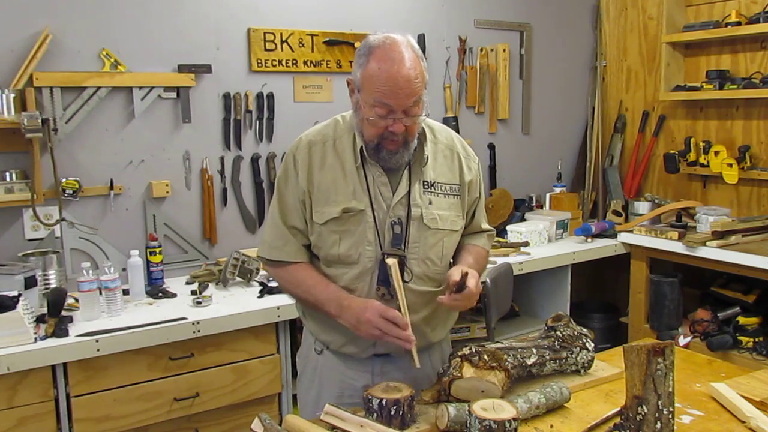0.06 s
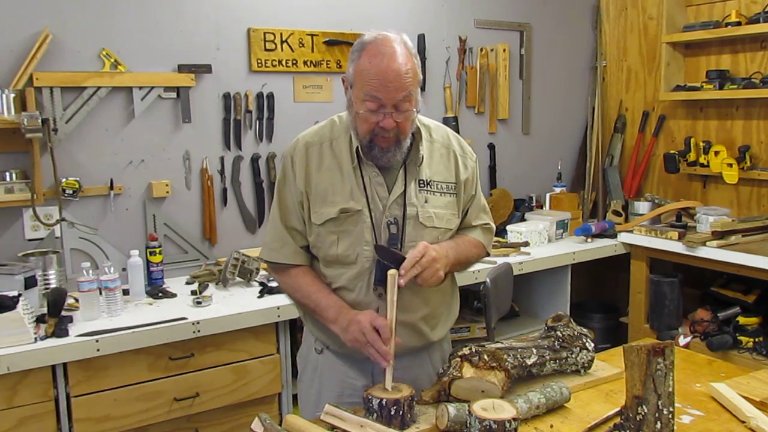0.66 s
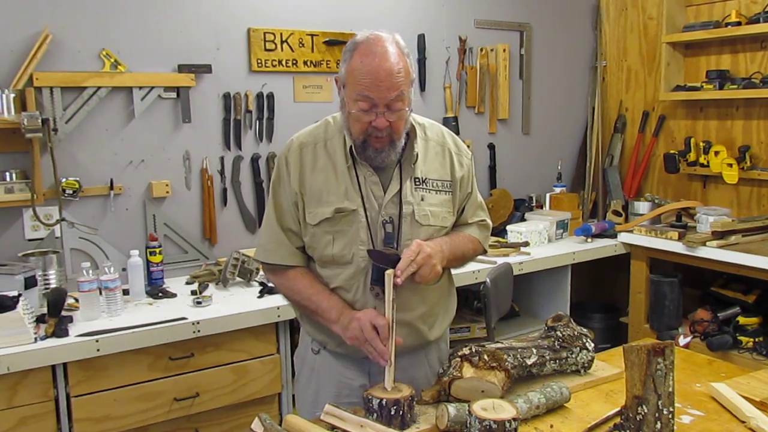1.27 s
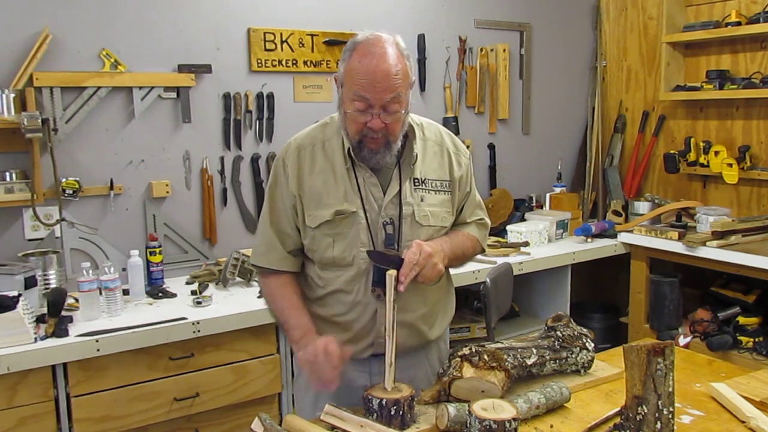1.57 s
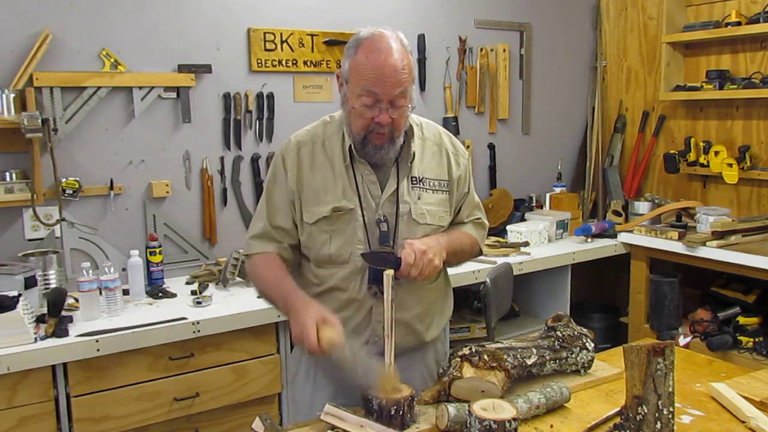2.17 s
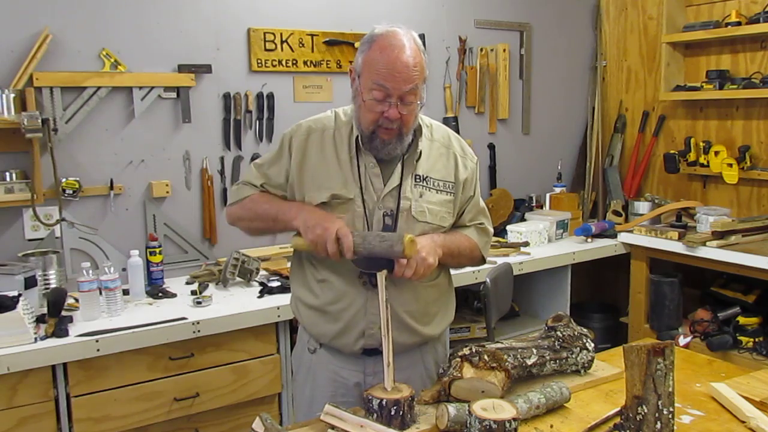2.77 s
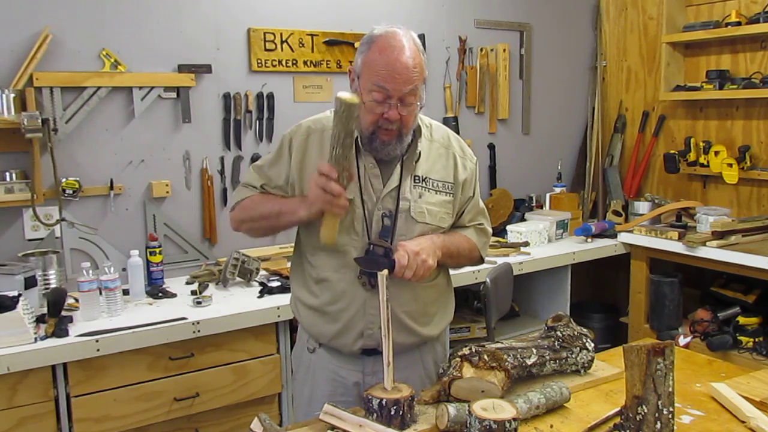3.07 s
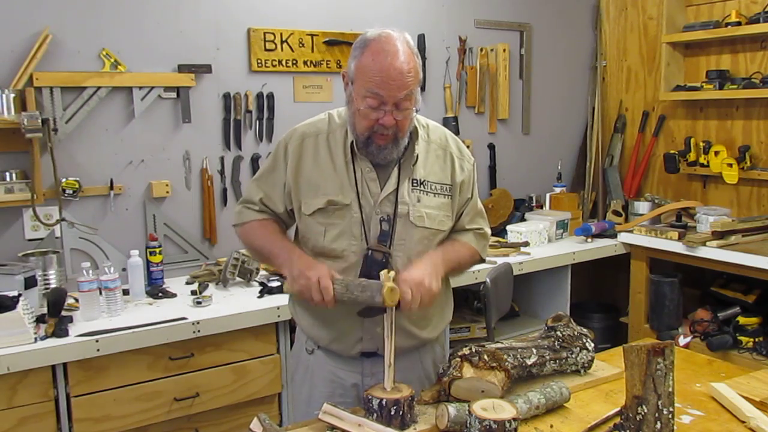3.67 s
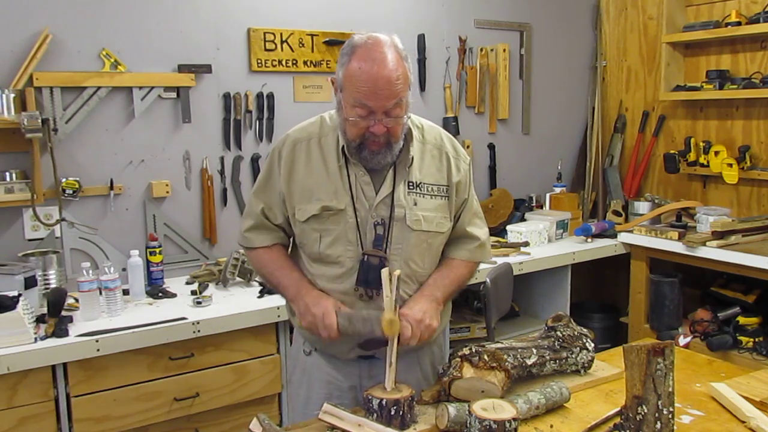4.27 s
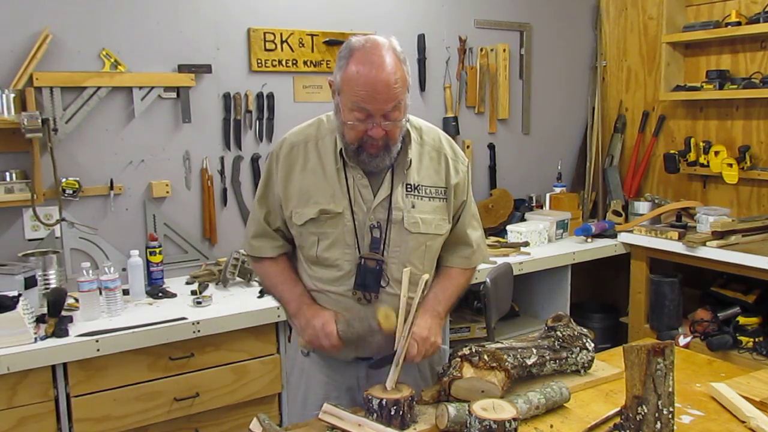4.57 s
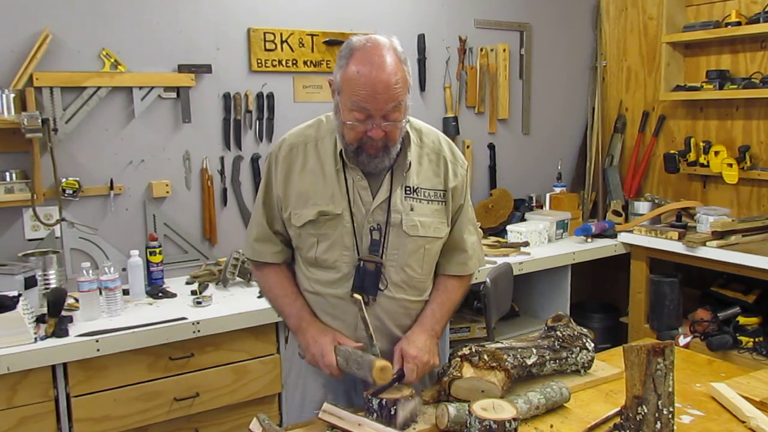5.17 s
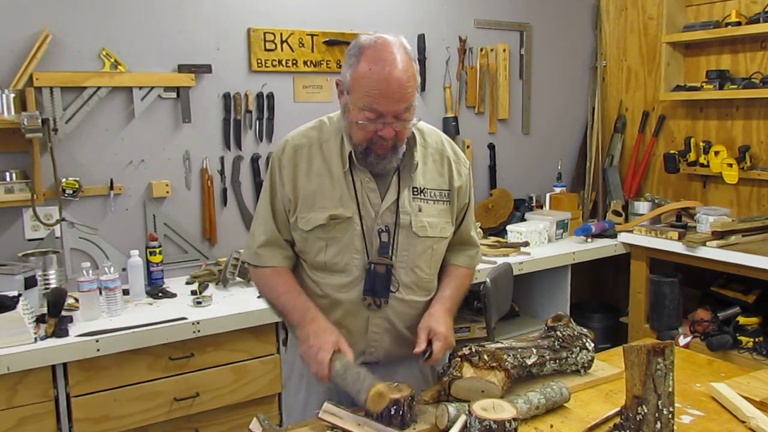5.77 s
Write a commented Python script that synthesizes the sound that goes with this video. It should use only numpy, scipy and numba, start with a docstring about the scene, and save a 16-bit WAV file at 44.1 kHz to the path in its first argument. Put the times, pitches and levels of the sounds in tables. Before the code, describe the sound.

Sharp wooden knocks on a knife's spine quicken as a stick cracks apart, its halves clattering onto a bench in a small workshop.

```python
"""A wooden club drives a knife down a thin stick standing on a log on a workbench.
Eight blows ring club, stick and blade, tear the fibres and shake the bench; the halves clatter down.
A sleeve brushes as the club is fetched. The small workshop echoes, over mains hum and air noise.
The camera clips on the blows and turns its gain down after them."""
import sys
import numpy as np
from scipy import signal
from scipy.fft import rfft, irfft
from scipy.io import wavfile
from scipy.ndimage import uniform_filter1d
from numba import njit

SR = 44100
rng = np.random.default_rng(int(sys.argv[2]) if len(sys.argv) > 2 else 0)


def transcribe(signal):
    """Save signal, clipped to [-1, 1], as a 16-bit WAV file at the path in sys.argv[1]."""
    frames = np.atleast_2d(signal).T
    limited = np.clip(frames, -1, 1)
    pcm = np.round(limited * 32767).astype(np.int16)
    wavfile.write(sys.argv[1], SR, pcm)


N = 265217
AGE_S = np.arange(int(0.8 * SR)) / SR
TOP_HZ = 15950

# start_s, depth_fraction, club_db, stick_db, stick_hz, blade_db, bench_db
BLOWS = [(2.7935, 0, -5, -3, 1481, 0.5, -10.5), (3.2291, .06, -4, 1.5, 1473, 10, -13),
         (3.6719, 0.03, -6, -9.5, 1610, -4, -19), (3.987, 0.59, -6, -4.5, 1658, 5.5, -28.5),
         (4.2326, 0.57, -6, -3.5, 1537, -6, -23.5), (4.4834, 0.59, -5.5, 1.5, 1502, -16, -20),
         (4.7245, 0.63, -5.5, 3, 1533, -21.5, -20.5), (4.9583, 0.93, -8.5, -1.5, 1530, -23, -15.5)]
def club_blows(steel_db=-32, choke_db=-46):
    """Each blow rings club, stick, knife and bench; deeper in, the wood chokes the steel's long ring."""
    out = np.zeros(N)
    for start_s, depth, club_db, stick_db, stick_hz, blade_db, bench_db in BLOWS:
        impact = club(club_db) + stick(stick_db, stick_hz) + blade(blade_db)
        steel = steel_ring(steel_db + choke_db * depth, centre_hz=3900)
        edge_snap = undb(club_db - 10) * fibres(t60_s=0.0059)
        add(out, start_s, impact + steel + edge_snap + tear(depth))
        add(out, start_s + 0.002987, undb(bench_db) * bench(rise_s=0.0044))
    return out

# pitch_hz, level_db, t60_s
CLUB_MODES = [(415.8, -12.5, 0.092), (634, -11, 0.0079), (927, -3, 0.022), (1030, -15.5, 0.022),
              (1308, -4.5, 0.015), (1804, -2.5, 0.036), (2707, -8, 0.025)]
# freq_hz, density_db
BARK_SPECTRUM = [(100, -35), (450, -24.5), (900, -15), (2200, -2.5), (4000, -23.5), (16000, -55)]
def club(level_db):
    """The club's modes ring while its bark crushes on the knife's spine."""
    bark = undb(-12) * noise(BARK_SPECTRUM) * fade(0.019) * swell(0.00063)
    return undb(level_db) * (ring(CLUB_MODES, contact_s=0.00096, detune=0.052) + bark)

# pitch_ratio, level_db, t60_s
STICK_MODES = [(0.955, -9.5, 0.023), (1.001, 1.5, 0.027), (1.07, -15.5, 0.071)]
def stick(level_db, pitch_hz):
    """The struck stick rings in three close modes around its note."""
    modes = np.array(STICK_MODES) * [pitch_hz, 1, 1]
    return undb(level_db) * ring(modes, contact_s=0.00094, detune=0.0076)

# pitch_hz, level_db, t60_s
BLADE_MODES = [(2850, -18.5, 0.03), (3220, 4.5, 0.014), (3307, 8.5, 0.0082), (5030, -11.5, 0.01)]
def blade(level_db):
    """The blade rings briefly under the club."""
    return undb(level_db) * ring(BLADE_MODES, contact_s=0.00079, detune=0.035)

# pitch_hz, level_db, t60_s
STEEL_MODES = [(3350, -10, .5), (3250, -3, 0.41), (5250, -10, 0.26), (5080, -3, 0.43), (5150, -7, .25),
               (5200, -11, 0.27), (7550, -4.5, 0.25), (7700, -12, .3), (10950, -16, 0.27)]
def steel_ring(level_db, centre_hz):
    """The steel sings long and thin in the modes near a centre."""
    return undb(level_db) * ring(favour(STEEL_MODES, centre_hz, spread_oct=0.44), contact_s=0.0028)

# start_s, level_db, centre_hz
STEEL_RINGS = [(2.797, -28.5, 5400), (3.243, -19.5, 9500), (4.982, -15.5, 9400)]
def steel_rings():
    """The knife's steel sings out at the first two blows and as the stick parts."""
    out = np.zeros(N)
    for start_s, level_db, centre_hz in STEEL_RINGS:
        add(out, start_s, steel_ring(level_db, centre_hz))
    return out

# freq_hz, density_db
FIBRE_SPECTRUM = [(300, -45), (1000, -10.5), (2500, -2.5), (4200, 0), (5500, 5), (8000, -1.5), (11000, 1),
                  (13000, -3), (16000, -29.5)]
def fibres(t60_s, grain_db=5):
    """Wood fibres snap: a dying shower of uneven tiny cracks."""
    grain = uniform_filter1d(rng.standard_normal(len(AGE_S)), size=16) * np.sqrt(16)
    sizes = undb(grain_db * grain)
    sizes /= np.sqrt(np.mean(sizes ** 2))
    return noise(FIBRE_SPECTRUM) * sizes * fade(t60_s) * swell(0.00015)

def tear(depth):
    """Fibres tear ahead of the edge: softer, longer and finer from top (0) to foot (1)."""
    gain = glide(undb(-4), undb(-26.5), depth)
    t60_s = glide(0.027, 0.27, depth)
    cutoff_hz = glide(9000, 14000, depth ** 0.27)  # bright as soon as the edge is in
    return gain * lowpass(fibres(t60_s), cutoff_hz, order=4)

# pitch_hz, level_db, t60_s
BENCH_MODES = [(117.55, -9, 0.54), (139.2, -14.5, 0.46), (197.4, -4.5, 0.47), (244.7, -11, 0.46),
               (273.4, -7, 0.43), (332.5, -1.5, 0.12), (381.4, -7.5, 0.29), (432.4, -2.5, 0.2),
               (494, -17.5, 0.18), (565, -10, 0.064), (698, 1, 0.12)]
# freq_hz, density_db
THUD_SPECTRUM = [(20, -41), (70, -28.5), (150, -9.5), (380, -10.5), (900, -13), (1500, -8), (3000, -9),
                 (6000, -32.5), (16000, -91)]
def bench(rise_s, cutoff_hz=1500):
    """The heavy bench top and its load thud; a soft touch wakes only the low modes."""
    modes = undb(-8) * ring(BENCH_MODES, rise_s, detune=0.0098)
    thud = undb(4) * noise(THUD_SPECTRUM) * fade(0.31) * swell(rise_s)
    return lowpass(modes + thud, cutoff_hz)

# start_s, ring_db, centre_hz, bench_db
WOOD_KNOCKS = [(0.095, -40.5, 477, -33.5), (0.132, -23.5, 660, -26), (0.186, -30.5, 720, -30),
               (0.42, -36.5, 443, -29.5), (1.815, -38, 450, -32), (2.837, -19.5, 950, -15),
               (3.041, -42.5, 960, -57), (3.112, -45.5, 920, -65), (3.243, -9.5, 960, -11),
               (4.9812, -10, 800, -3.5), (4.989, -8.5, 1480, -10), (5.171, -23.5, 1000, -26),
               (5.2588, -17, 1070, -13), (5.2875, -11, 1050, -10.5), (5.48, -20, 640, -13),
               (5.8201, -22.5, 668, -37.5), (5.867, -29.5, 770, -33.5)]
def wood_knocks():
    """Wood knocks as it is handled, jolts after a blow or falls: it rings, scuffs and thuds the bench."""
    out = np.zeros(N)
    for start_s, ring_db, centre_hz, bench_db in WOOD_KNOCKS:
        thud = undb(bench_db) * bench(rise_s=0.0045, cutoff_hz=0.94 * centre_hz)
        scuff_db = -15.5 + 1.274 * ring_db  # grows faster than the ring
        add(out, start_s, slat(ring_db, centre_hz, spread_oct=0.66) + scuff(scuff_db) + thud)
    return out

# start_s, ring_db, centre_hz, spread_oct
CLINKS = [(1.813, -30.5, 2600, 0.3), (5.452, -9.5, 3560, 0.043), (5.4856, -8, 1280, 0.18),
          (5.6178, -3.5, 2380, 0.053), (5.619, -9.5, 1230, 0.029), (5.7223, -8, 5600, 0.15)]
def clinks():
    """A piece tapped on its end or edge rings in few modes, with little scuff."""
    out = np.zeros(N)
    for start_s, ring_db, centre_hz, spread_oct in CLINKS:
        add(out, start_s, slat(ring_db, centre_hz, spread_oct) + scuff(ring_db - 33))
    return out

# pitch_hz, level_db, t60_s
SLAT_MODES = [(390, 7.5, 0.015), (521, 0.5, 0.063), (617, 2, 0.041), (784, 10, 0.023), (981, 1.5, 0.042),
              (1107, -2, 0.063), (1206, -9, 0.11), (1303, 2, 0.045), (1610, 3, 0.013), (2007, -1, .05),
              (2336, -7, 0.057), (2940, -2.5, 0.019), (3796, -7.5, .08), (4910, -12.5, .09),
              (6900, -7, 0.03)]
def slat(level_db, centre_hz, spread_oct):
    """A loose piece of wood rings after a hard contact."""
    return undb(level_db) * ring(favour(SLAT_MODES, centre_hz, spread_oct), contact_s=0.00012)

# freq_hz, density_db
SCUFF_SPECTRUM = [(300, -2), (1000, -4), (2500, -6.5), (4000, -9.5), (7000, -11.5), (11000, -17),
                  (13000, -21.5), (16000, -38)]
def scuff(level_db):
    """Wood on wood: a sharp first touch, then a short scrape."""
    envelope = undb(10.5) * fade(0.018) + undb(4.5) * fade(0.29)
    return undb(level_db) * noise(SCUFF_SPECTRUM) * envelope

# start_s, level_db
SCRAPES = [(0.001, -43.5), (1.827, -48), (5.622, -30.5), (5.798, -35)]
def scrapes():
    """Wood slides a short way."""
    out = np.zeros(N)
    for start_s, level_db in SCRAPES:
        add(out, start_s, scuff(level_db))
    return out

# start_s, level_db, cutoff_hz
BUMPS = [(0.001, -23.5, 277), (1.926, -24, 219.3), (2.002, -35, 247), (2.829, -1, 110), (3.281, -10, 161),
         (4.114, -26, 186), (4.252, -20, 172), (4.31, -23, 186), (5.625, -16, 194), (5.698, -26, 597),
         (5.76, -25.5, 700)]
def bumps():
    """Hand and log bump dully on the bench."""
    out = np.zeros(N)
    for start_s, level_db, cutoff_hz in BUMPS:
        add(out, start_s, undb(level_db) * bench(rise_s=0.006, cutoff_hz=cutoff_hz))
    return out

# peak_s, level_db, width_s
BRUSHES = [(1.815, -62.5, 0.12), (1.959, -53.5, 0.076), (2.038, -49, 0.072), (2.334, -62.5, 0.27),
           (2.417, -47.5, 0.067), (2.457, -40.5, 0.04), (2.65, -54.5, 0.19)]
# freq_hz, density_db
CLOTH_SPECTRUM = [(300, -25.5), (1500, -3), (3500, 6.5), (7000, 6), (11500, 10), (14000, -3), (20000, -11)]
def sleeve(start_s=1.32, end_s=2.4, rustle_db=-70, rise_fraction=0.51):
    """Cloth rustles through the reach for the club; brushes of sleeve and palm swell and die."""
    t = np.arange(N) / SR
    envelope = undb(rustle_db) * ((t > start_s) & (t < end_s))
    for peak_s, level_db, width_s in BRUSHES:
        flank_s = width_s * np.where(t < peak_s, rise_fraction, 1 - rise_fraction)
        envelope += undb(level_db) * np.exp(-2 * ((t - peak_s) / flank_s) ** 2)
    return noise(CLOTH_SPECTRUM, N) * envelope

# freq_hz, t60_s, reflected_db, side_db
ROOM = [(98, 0.53, -14.5, -5.5), (300, 0.25, -3, -12), (1060, 0.25, -4.5, -6), (1590, 0.31, -8.5, -2.5),
        (3220, 0.31, -5.5, 0), (6000, 0.45, -3.5, -1), (11400, 0.19, -6.5, 3), (16000, 0.17, -12.5, 2.5)]
def reflections():
    """Dense echoes off walls and shelves, each octave dying at its own pace."""
    size = len(AGE_S)
    hz, tail = bins_hz(size), np.zeros(size)
    white = rfft(rng.standard_normal(size))
    centres_hz = np.geomspace(64, 16384, 9)
    for centre_hz, weights in zip(centres_hz, np.eye(9)):
        band = irfft(white * lookup(hz, np.column_stack([centres_hz, weights])), size)
        tail += band * fade(lookup(centre_hz, ROOM)) * swell(0.0014)
    # flatten the random tail's spectrum before applying the room's levels
    response = rfft(tail)
    response /= np.sqrt(uniform_filter1d(np.abs(response) ** 2, size=70))
    return irfft(response * undb(lookup(hz, ROOM, column=2)), size) * (AGE_S < 0.75 * AGE_S[-1])

def widen(mid, side):
    """Diffuse sound reaches both microphones alike in the bass, less so in the treble."""
    side_gain = undb(lookup(bins_hz(len(side)), ROOM, column=3))
    side = irfft(rfft(side) * side_gain, len(side))
    return np.array([mid + side, mid - side])

# pitch_hz, rms_db
HUM_PARTIALS = [(119.8, -51), (360, -61.5), (480, -71.5), (600, -75), (720, -70), (1080, -73),
                (1440, -74.5), (1560, -74), (1680, -68)]
def mains_hum(waver_db=1):
    """Mains hum, each partial wavering slightly in level."""
    t, knots_s = np.arange(N) / SR, np.linspace(0, N / SR, 40)
    out = np.zeros(N)
    for pitch_hz, rms_db in HUM_PARTIALS:
        drift_db = waver_db * np.interp(t, knots_s, rng.standard_normal(len(knots_s)))
        out += np.sqrt(2) * undb(rms_db + drift_db) * np.sin(2 * np.pi * (pitch_hz * t + rng.random()))
    return out

# freq_hz, density_db
AIR_SPECTRUM = [(15, -58), (25, -9.5), (64, -4), (94, -5), (123, -2), (223, -12), (309, -14), (354, -12.5),
                (531, -17.5), (714, -19), (1230, -21.5), (1700, -23.5), (2050, -25), (10700, -36),
                (16000, -46)]
def air():
    """Steady, diffuse air noise."""
    return undb(-52.5) * widen(noise(AIR_SPECTRUM, N), noise(AIR_SPECTRUM, N))

def ring(modes, contact_s, detune=0.0033):
    """Modes swell during contact; grip and strike point shift them a little each time."""
    hz, db, t60_s = np.transpose(modes)[:, :, None]
    hz = hz * (1 + detune * rng.standard_normal(hz.shape))
    sign = (-1) ** np.arange(len(hz))[:, None]  # neighbours swing opposite ways
    partials = sign * undb(db) * fade(t60_s) * np.sin(2 * np.pi * hz * AGE_S)
    return partials.sum(0) * swell(contact_s)

def favour(modes, centre_hz, spread_oct):
    """The contact point favours the modes around a centre."""
    return [(hz, db - 10 * np.log10(1 + (np.log2(hz / centre_hz) / spread_oct) ** 4), t60_s)
            for hz, db, t60_s in modes]

def noise(spectrum, size=len(AGE_S)):
    """Coloured noise, rms 1."""
    x = irfft(rfft(rng.standard_normal(size)) * undb(lookup(bins_hz(size), spectrum)), size)
    return x / x.std()

def lowpass(x, cutoff_hz, order=2):
    """Butterworth low-pass."""
    return signal.sosfilt(signal.butter(order, min(cutoff_hz, TOP_HZ), fs=SR, output="sos"), x)

def fade(t60_s):
    """Exponential decay."""
    return np.exp(-np.log(1000) * AGE_S / t60_s)

def swell(rise_s):
    """Smooth onset."""
    return 1 - np.exp(-(AGE_S / rise_s) ** 2)

def glide(start, end, fraction):
    """Geometric interpolation."""
    return start * (end / start) ** fraction

def lookup(hz, table, column=1):
    """Table column interpolated over log frequency."""
    rows = np.array(table)
    return np.interp(np.log(np.maximum(hz, 1)), np.log(rows[:, 0]), rows[:, column])

def bins_hz(size):
    """FFT bin frequencies."""
    return np.fft.rfftfreq(size, 1 / SR)

def undb(db):
    """Decibels to gain."""
    return 10 ** (np.asarray(db) / 20)

def add(track, start_s, sound):
    """Mix a sound into the track."""
    start = max(int(start_s * SR), 0)
    track[start:start + len(sound)] += sound[:max(N - start, 0)]

def scene():
    """Bench work, direct and reflected, over hum and air."""
    direct = club_blows() + steel_rings() + wood_knocks() + clinks() + scrapes() + bumps() + sleeve()
    room_response = widen(reflections(), reflections())
    echoes = signal.fftconvolve(direct[None], room_response, axes=1)[:, :N]
    return direct + echoes + mains_hum() + air()

@njit
def follow(x, attack, release):
    """Level detector; attack and release are per-sample coefficients."""
    out, level = np.empty(len(x)), 0.
    for i in range(len(x)):
        level += (x[i] - level) * (attack if x[i] > level else release)
        out[i] = level
    return out

# freq_hz, left_minus_right_db
MIC_BALANCE = [(100, -0.7), (500, -1.3), (1500, -1.5), (3200, -3), (4500, 1), (8000, -2), (13000, -3.5)]
def record(dry, knee_db=-18, attack_s=0.017, release_s=0.58, low_cut_hz=28):
    """Camera gain control ducks too late for each crack, which clips; the gain then creeps back."""
    balance = undb(np.outer([0.5, -0.5], lookup(bins_hz(N), MIC_BALANCE)))
    sound = irfft(rfft(dry) * balance, N)
    sound = signal.sosfilt(signal.butter(2, low_cut_hz, "high", fs=SR, output="sos"), sound)
    level = follow(np.abs(sound).max(0), 1 / (attack_s * SR), 1 / (release_s * SR))
    clipped = np.clip(sound / np.maximum(level / undb(knee_db), 1), -1, 1)
    return signal.sosfilt(signal.ellip(10, 0.1, 100, TOP_HZ, fs=SR, output="sos"), clipped)

dry = scene()
out = record(dry)
transcribe(out)
```